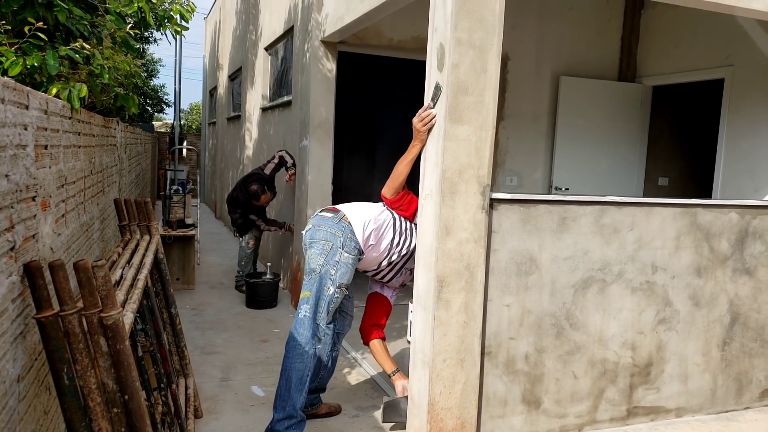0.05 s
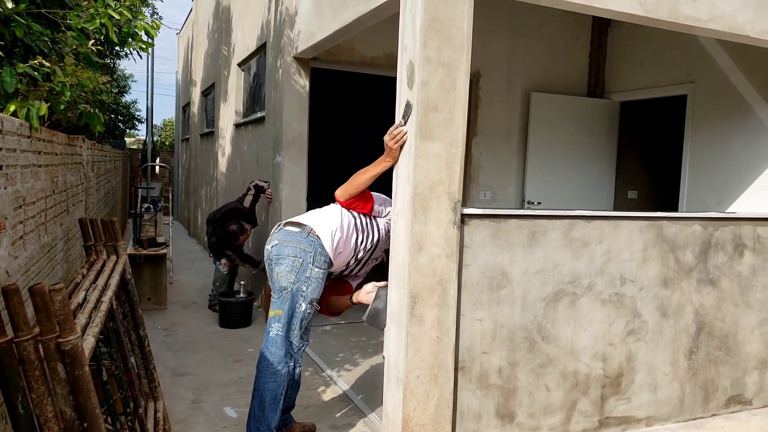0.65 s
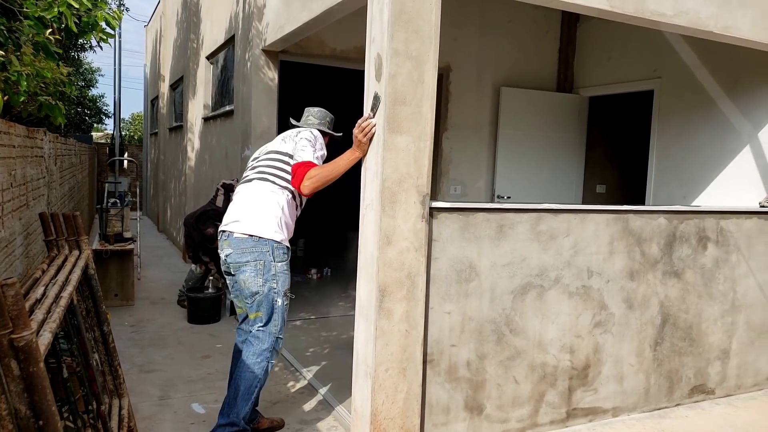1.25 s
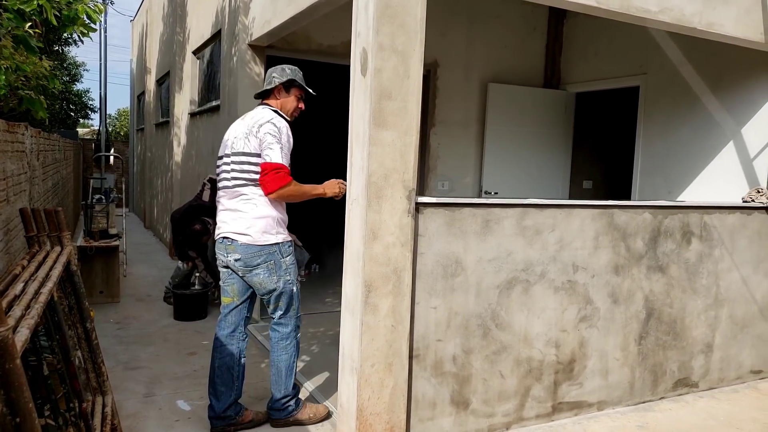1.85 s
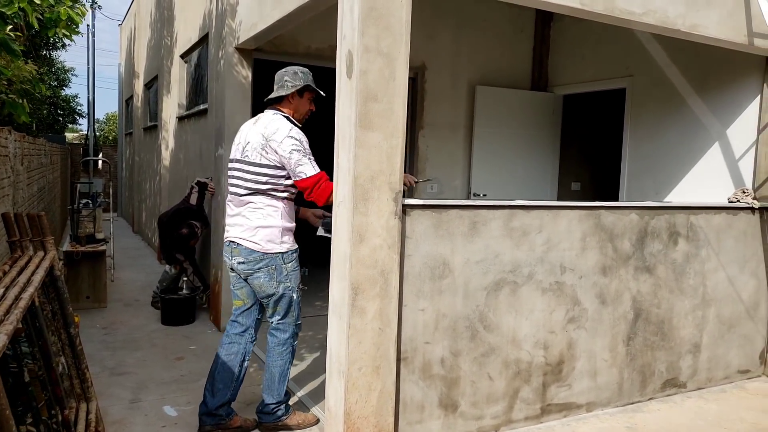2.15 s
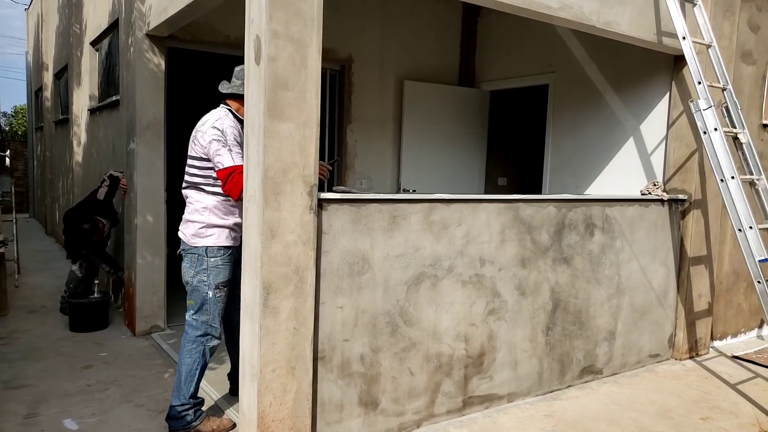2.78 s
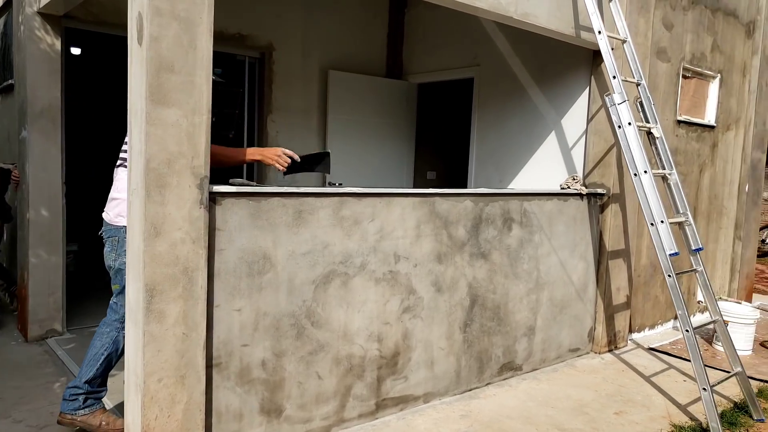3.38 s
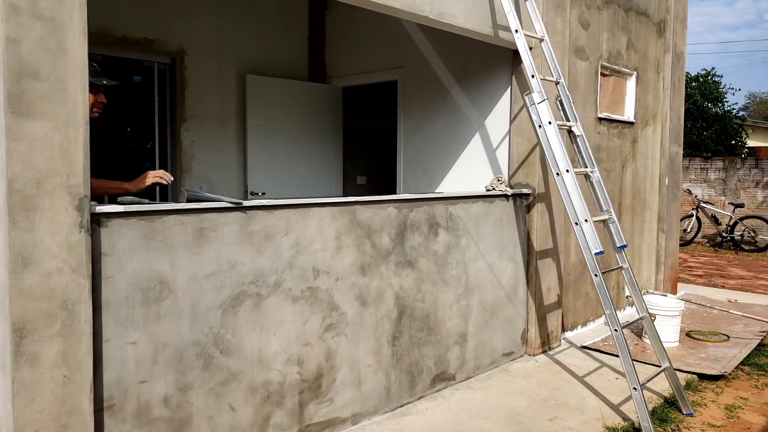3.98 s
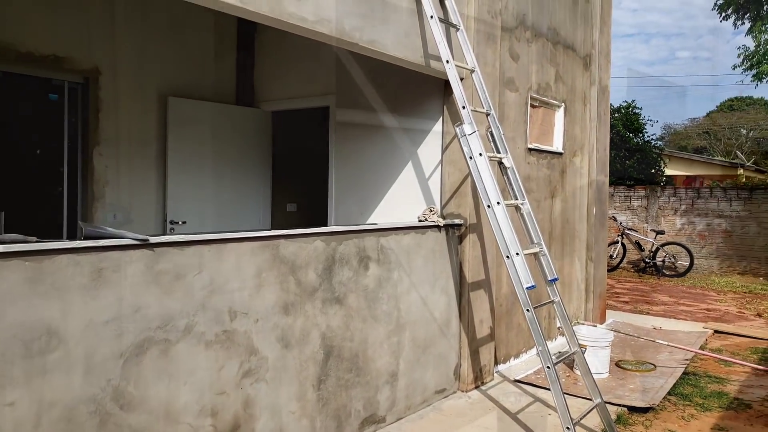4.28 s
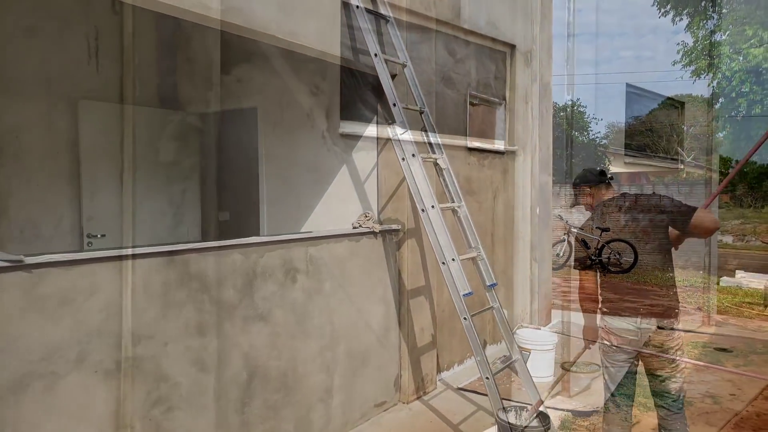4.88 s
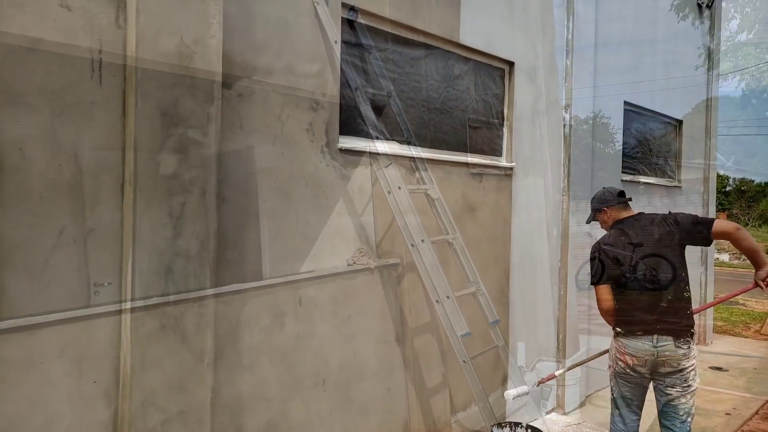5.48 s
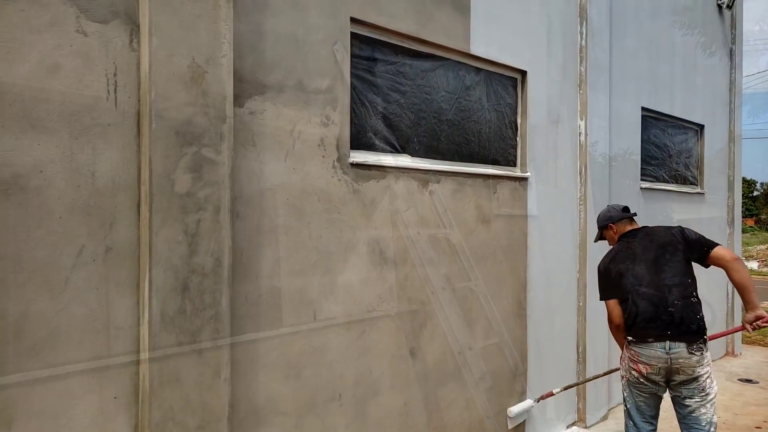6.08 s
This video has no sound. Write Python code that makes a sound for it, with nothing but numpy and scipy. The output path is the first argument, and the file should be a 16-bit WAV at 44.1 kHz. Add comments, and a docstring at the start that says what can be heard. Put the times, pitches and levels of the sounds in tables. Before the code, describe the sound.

On an open building site, someone sands a cement wall by hand with a gritty, hissing rasp. The first strokes are loud and near, followed by a run of soft, quick ones, a firmer stretch, and slower strokes fading into the distance. A few soft thuds of the hand mix in. Bare walls add a little reverberation, while the air rumbles quietly and a machine hums far off.

```python
"""Sandpaper is rubbed by hand over a rendered cement wall on a building site, heard in mono.
First come hard strokes close by: sand grains catch and snap, and this friction noise excites the
resonance of the hollow under the hand. Quick, light strokes follow behind a pillar, then firm ones
along a ledge, and last long ones that recede. Now and then the hand knocks on the wall.
Throughout, the bare walls reflect the work, the open air rumbles and a machine hums far off."""
import sys
import numpy as np
from scipy import signal
from scipy.fft import rfft, irfft, next_fast_len
from scipy.io import wavfile
from scipy.ndimage import uniform_filter1d, map_coordinates

SR = 44100
rng = np.random.default_rng(int(sys.argv[2]) if len(sys.argv) > 2 else 0)


def wav_record(signal):
    """Record a signal, one row per channel, as 16-bit PCM in the file named by sys.argv[1]."""
    frames = np.transpose(np.atleast_2d(signal))
    bounded = np.clip(frames, -1, 1)
    # unit amplitude maps onto the largest positive 16-bit level
    quanta = np.round(bounded * 32767).astype(np.int16)
    wavfile.write(sys.argv[1], SR, quanta)


N = 270317

# Strokes of the hand. Each row: start in seconds, length in seconds, relative rasp level in dB,
# hiss over the rasp in dB, resonance of the hollow in Hz, its share of the rasp power at mid-stroke.
STROKE_PLAN = [ (-.043, 0.25, -17, -4, 1207, 0.16), (0.197, .14, -16, -3, 2032, 0.27),
               (0.372, .12, -16.5, -2.5, 1185, 0.13), (.503, 0.093, -14.5, -1, 2350, .12),
               (0.595, .075, -18, 1.5, 1557, .3), (0.655, 0.094, -15, -1, 2416, 0.34),
               (0.727, 0.066, -15, -8, 1595, 0.31), (0.793, 0.072, -26.5, 1, 1550, 0),
               (0.89, 0.25, -31, -4.5, 3450, 0.14), (1.091, 0.18, -31.5, -5.5, 2970, 0.07),
               (1.28, .154, -32, -3, 3180, .04), (1.426, .1, -30.5, -5, 3190, .03),
               (1.562, .1, -31.5, -3, 3140, 0), (1.707, 0.1, -32, -4.5, 3120, 0.01),
               (1.842, .096, -29.5, -7, 1392, 0.07), (1.989, 0.096, -30.5, -5, 1990, .12),
               (2.118, 0.092, -29.5, -5.5, 2220, 0.08), (2.271, .11, -30, -3.5, 2060, 0.1),
               (2.421, 0.093, -27.5, -3, 3190, 0.03), (2.545, 0.16, -27.5, -3.5, 3210, 0.05),
               (2.739, .12, -28.5, -2.5, 2880, 0.12), (2.867, 0.15, -26, -4, 2330, 0.06),
               (3.033, .115, -26.5, -2, 1490, 0.08), (3.176, 0.12, -23, -1, 1423, 0.25),
               (3.334, 0.09, -20.5, -2.5, 1569, 0.24), (3.486, .16, -19, -1.5, 1333, 0.06),
               (3.636, .12, -20.5, -.5, 2480, 0.23), (3.77, 0.16, -22.5, -2, 3580, .07),
               (3.856, .22, -21.5, -1, 2140, 0.17), (4.08, .25, -23, 0, 950, 0),
               (4.331, .15, -26, 2, 1542, 0.2), (4.494, 0.096, -24, -1.5, 1682, 0.02),
               (4.592, .13, -27.5, 0, 1690, 0.06), (4.719, .11, -27.5, 1, 3850, 0.1),
               (4.842, .125, -29, -2, 1464, 0.2), (4.958, .19, -30.5, 1, 2040, 0),
               (5.132, .161, -33.5, -1.5, 860, .04), (5.331, .14, -35.5, 0.5, 1458, .28),
               (5.526, .15, -36.5, -1, 1460, .14), (5.721, .15, -35.5, -1.5, 1647, .2),
               (5.888, 0.18, -38, 2, 1407, 0), ]
# Friction spectra at five places on the wall. Each row: frequency in Hz, relative density in dB.
NEAR_SPECTRUM = [(220, -29.5), (400, -21.5), (800, -16.5), (1000, -8.5), (1250, -5), (2200, 1.5), (2700, 0),
                 (3400, -2.5), (4300, -6), (6000, -9), (8400, -5), (10000, -14.5), (12000, -26),
                 (15400, -37)]
PILLAR_SPECTRUM = [(220, -34), (400, -15), (800, -9), (1000, -6.5), (1250, -1), (2200, 3), (2700, -1.5),
                   (3400, -4.5), (4300, -13.5), (6000, -16.5), (8400, -12), (10000, -20.5), (12000, -33),
                   (15400, -45)]
CORNER_SPECTRUM = [(220, -39), (400, -22), (800, -19), (1000, -13.5), (1250, -3), (2200, -3.5), (2700, -5),
                   (3400, -7), (4300, -6.5), (6000, -6.5), (8400, -0.5), (10000, -10.5), (12000, -24),
                   (15400, -33)]
LEDGE_SPECTRUM = [(220, -28), (400, -21), (800, -16.5), (1000, -11), (1250, -1), (2200, 2), (2700, -0.5),
                  (3400, -6), (4300, -11), (6000, -9.5), (8400, -6), (10000, -18), (12000, -29),
                  (15400, -36)]
FAR_SPECTRUM = [(220, -24.5), (400, -28), (800, -14.5), (1000, -9), (1250, -3.5), (2200, 1.5), (2700, -5),
                (3400, -4.5), (4300, -8), (6000, -7.5), (8400, -3.5), (10000, -14), (12000, -26.5),
                (15400, -36)]
# Moves from each place to the next. Each row: midpoint in seconds, duration in seconds.
HAND_MOVES = [(.87, 0.093), (2.48, 0.95), (3.6, 0.076), (4.6, 0.54)]
# Faint resonances of the stiff sheet. Each row: centre in Hz, width in Hz, boost in dB.
SHEET_MODES = [(3550, 230, 1), (4950, 170, 2)]
# Knocks of the hand on the wall. Each row: start in seconds, relative level in dB, pitch in Hz.
HAND_KNOCKS = [(1.103, -30, 291), (1.939, -30, 529.7), (2.522, -31, 490.3), (3.594, -22, 437),
               (4.536, -32, 484)]
# Reflection off the neighbouring wall face. Each row: time in seconds, delay in ms, relative amplitude.
WALL_REFLECTION = [(0, .65, 0), (2.4, 0.65, 0.07), (2.9, 0.46, 0), (3.5, 0.78, 0.18), (4.0, 0.85, 0.12),
                   (4.5, 1.24, 0.12), (5.05, 1.46, 0.15), (6.1, 1.6, .03)]
# Reverberation of the yard. Each row: frequency in Hz, time to fall 60 dB in seconds.
YARD_DECAY = [(200, 0.89), (2000, 0.17), (10000, 0.017)]
# Tones of the distant machine. Each row: frequency in Hz, base level in dB.
HUM_TONES = [(86.5, -61.5), (120, -56), (180, -69)]
# Rise and fall of the hum. Each row: time in seconds, gain in dB.
HUM_GAIN = [(0, -1), (3, -1), (3.8, 4), (4.5, -18), (6.1, -6)]
# Spectrum of the outdoor rumble. Each row: frequency in Hz, relative density in dB.
AIR_SPECTRUM = [(20, -18), (35, -8), (55, 3), (85, -0.5), (140, -10), (220, -14), (500, -9.5), (1000, -9),
                (4000, -11.5), (15000, -51)]
# Strength of the outdoor rumble. Each row: time in seconds, level in dB.
RUMBLE_LEVEL = [(0, -45.5), (2.8, -46), (3.6, -40), (4.4, -43), (6.1, -45)]
# Stroke envelopes. Each gives: attack in seconds, swell in dB, release in dB per second.
RASP_ENVELOPE = (.013, 2.9, 113)
GRIT_ENVELOPE = (0.018, 3.15, 147)


def sanding(split_hz=4000, fizz_hz=10500, rasp_trim_db=-0.13, grit_trim_db=0.24, fizz_db=0.5):
    """Sliding friction makes broadband noise: a rasp from the sheet, hiss and fizz from the grit."""
    rasp_gain, hiss_gain, fizz_gain, hollow = strokes()
    low = lambda hz: 1 / np.sqrt(1 + (hz / split_hz) ** 12)
    high = lambda hz: np.sqrt(1 - low(hz) ** 2)
    sheet = on_wall(flicker(grains(1800, spread_db=3, fine_share=0.58), depth_db=2.0, bins=6), low)
    grit = on_wall(flicker(grains(4000, spread_db=1, fine_share=.62), depth_db=1.5, bins=9), high)
    hiss = filtered(grit, lambda hz: 1 / (1 + (hz / fizz_hz) ** 16))
    scratch = hiss_gain * hiss + amp(fizz_db) * fizz_gain * (grit - hiss)
    # stick-slip over bumps in the render shakes all bands together
    judder = amp(-0.17 * wobble(110))
    return judder * (amp(rasp_trim_db) * (rasp_gain * sheet + hollow) + amp(grit_trim_db) * scratch)


def strokes(hollow_width_hz=140, hollow_wander=.02, fizz_exponent=1.36):
    """Incoherent strokes add in power. Returns rasp, hiss and fizz gains and the hollow's ringing."""
    t = np.arange(N) / SR
    rasp, hiss, fizz, hollow = np.zeros((4, N))
    # a resonance driven by noise is a carrier with two slow, random components in quadrature
    narrow = lambda hz: 1 / (1 + (hz / hollow_width_hz) ** 2)
    in_phase, quadrature = [unit(filtered(rng.standard_normal(N), narrow)) for _ in range(2)]
    clock = np.cumsum(1 + hollow_wander * wobble(25)) / SR  # the hollow changes shape a little
    for start, length, db, grit_db, hz, share in STROKE_PLAN:
        now = slice(*np.searchsorted(t, [start, start + length + .5]))
        age = t[now] - start
        power = (amp(db) * envelope(age, length, RASP_ENVELOPE)) ** 2
        ring_share = np.clip(share * (.5 + np.minimum(age / length, 1)), 0, 1)
        phase = 2 * np.pi * (hz * clock[now] + rng.random())
        ring = in_phase[now] * np.cos(phase) + quadrature[now] * np.sin(phase)
        hollow[now] += np.sqrt(ring_share * power) * ring
        rasp[now] += (1 - ring_share) * power
        force = envelope(age, length, GRIT_ENVELOPE)
        hiss[now] += (amp(db + grit_db) * force) ** 2
        fizz[now] += (amp(db + grit_db) * force ** fizz_exponent) ** 2
    return np.sqrt(rasp), np.sqrt(hiss), np.sqrt(fizz), hollow


def envelope(age, length, shape, lean_db=5, drag_db=-16.5, drag_fall_db_per_s=57):
    """Friction noise grows with speed and pressure, then fades to a light drag as the hand turns."""
    attack_s, swell_db, release_db_per_s = shape
    hold = 1 - np.exp(-(age / attack_s) ** 2)
    progress = np.clip(age / length, 0, 1)
    speed = np.sin(np.pi * progress)
    after = np.maximum(age - length, 0)
    release = np.maximum(amp(-release_db_per_s * after), amp(drag_db - drag_fall_db_per_s * after))
    return hold * amp(swell_db * (speed - 1) + lean_db * (progress - .5)) * release


def grains(per_second, spread_db, fine_share):
    """Shot noise: coarse grains snap at random instants, while fine ones merge into an even hiss."""
    caught = rng.random(N) < per_second / SR
    polarity = rng.choice([-1, 1], N)
    size = amp(spread_db * np.clip(rng.standard_normal(N), -2, 2))
    snaps = unit(caught * polarity * size)
    return np.sqrt(1 - fine_share) * snaps + np.sqrt(fine_share) * rng.standard_normal(N)


def flicker(x, depth_db, bins):
    """Random amplitude modulation, smooth over frequency and time, makes the timbre flicker."""
    spectra = signal.stft(x, nperseg=1024)[2]
    field = uniform_filter1d(rng.standard_normal(spectra.shape), size=bins, axis=0)
    field = uniform_filter1d(field, size=7, axis=1)
    return signal.istft(spectra * amp(depth_db * unit(field)), nperseg=1024)[1][:N]


def on_wall(force, band):
    """Source and filter: one band of the friction force takes the colour of each place in turn."""
    t = np.arange(N) / SR
    places = NEAR_SPECTRUM, PILLAR_SPECTRUM, CORNER_SPECTRUM, LEDGE_SPECTRUM, FAR_SPECTRUM
    sound, *later = [unit(filtered(force, lambda hz: amp(along(place, hz)) * sheet_gain(hz) * band(hz)))
                     for place in places]
    for (midpoint, duration), there in zip(HAND_MOVES, later):
        crossfade = np.clip(.5 + (t - midpoint) / duration, 0, 1)
        sound = sound + crossfade * (there - sound)
    return sound


def sheet_gain(hz):
    """Resonance of the stiff sheet lifts a narrow band around each mode."""
    return amp(sum(db / (1 + (2 * (hz - centre) / width) ** 2) for centre, width, db in SHEET_MODES))


def knocks(t60_s=0.025, attack_s=0.0023, gain_db=3):
    """Each impact of the hand excites a damped oscillation, heard as a dull thud."""
    thuds = np.zeros(N)
    for start, db, hz in HAND_KNOCKS:
        age = np.maximum(np.arange(N) / SR - start, 0)
        rise = 1 - np.exp(-age / attack_s)
        thuds += amp(db + gain_db - 60 * age / t60_s) * rise * np.sin(2 * np.pi * hz * age)
    return thuds


def wall_bounce(x):
    """Interference with a close reflection forms a comb, which sweeps down as the path lengthens."""
    delay_ms, strength = curves(WALL_REFLECTION)
    reflected = map_coordinates(x, [np.arange(N) - delay_ms * SR / 1000], order=3)
    return (x + strength * reflected) / np.sqrt(1 + strength ** 2)


def yard(x):
    """Reverberation between the bare walls decays exponentially, the treble first."""
    hz, t, spectra = signal.stft(rng.standard_normal(SR // 2), SR, nperseg=256)
    decay = amp(-60 * t / along(YARD_DECAY, hz)[:, None])
    tail = signal.istft(spectra * decay, SR, nperseg=256)[1]
    return signal.fftconvolve(x, tail / np.linalg.norm(tail))[:N]


def machine_hum(waver_db=3.0, drift_rad=0.21):
    """Slow modulation of amplitude and phase makes the distant machine's tones unsteady."""
    t = np.arange(N) / SR
    hum = np.zeros(N)
    for hz, db in HUM_TONES:
        amplitude = np.sqrt(2) * amp(db + waver_db * wobble(3.64))
        hum += amplitude * np.sin(2 * np.pi * hz * t + drift_rad * wobble(4.4))
    return amp(curves(HUM_GAIN)[0]) * hum


def open_air():
    """Ambient noise with its greatest density in the bass is heard as a low rumble."""
    rumble = unit(filtered(rng.standard_normal(N), lambda hz: amp(along(AIR_SPECTRUM, hz))))
    return amp(curves(RUMBLE_LEVEL)[0]) * rumble


def amp(db):
    """Amplitude ratio of a level in decibels."""
    return 10 ** (np.asarray(db) / 20)


def unit(x):
    """Normalisation to an rms of 1."""
    return x / np.sqrt(np.mean(x ** 2) + 1e-20)


def along(points, hz):
    """Interpolation of (Hz, value) points on a logarithmic frequency axis."""
    frequencies, values = np.transpose(points)
    return np.interp(np.log(hz + 1), np.log(frequencies + 1), values)


def curves(rows):
    """Linear interpolation, sample by sample, of each column after the time."""
    times, *columns = np.transpose(rows)
    return [np.interp(np.arange(N) / SR, times, column) for column in columns]


def wobble(rate):
    """Spline interpolation through random knots, rate of them a second."""
    return map_coordinates(rng.standard_normal(int(N * rate / SR) + 4), [np.arange(N) * rate / SR])


def filtered(x, response):
    """Linear filtering: the spectrum is multiplied by a frequency response."""
    padded = next_fast_len(N + SR // 2)
    return irfft(rfft(x, padded) * response(np.fft.rfftfreq(padded, 1 / SR)), padded)[:N]


def scene(yard_db=-17):
    """Superposition of the work, its reverberation and the background, alike in both channels."""
    work = wall_bounce(sanding() + knocks())
    return np.tile(work + amp(yard_db) * yard(work) + machine_hum() + open_air(), (2, 1))


def record(dry, ceiling=0.82, top_hz=15480):
    """Soft saturation rounds the highest peaks, and a band limit removes the extreme treble."""
    rounded = dry / (1 + np.abs(dry / ceiling) ** 8) ** (1 / 8)
    return np.array([filtered(channel, lambda hz: hz < top_hz) for channel in rounded])


dry = scene()
out = record(dry)
wav_record(out)
```